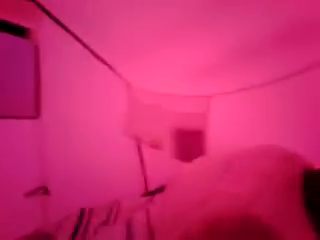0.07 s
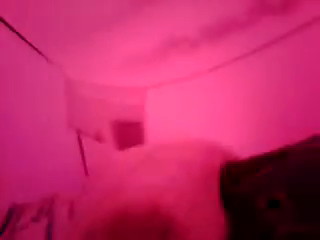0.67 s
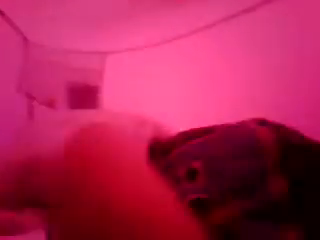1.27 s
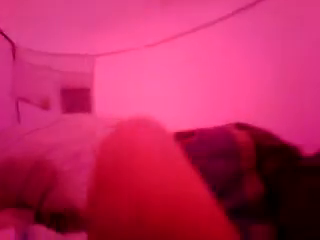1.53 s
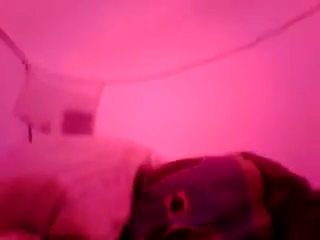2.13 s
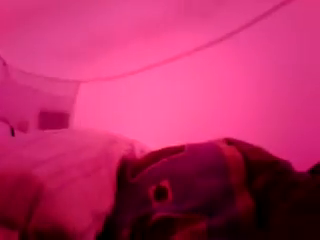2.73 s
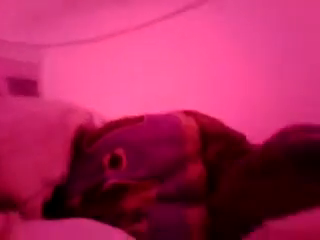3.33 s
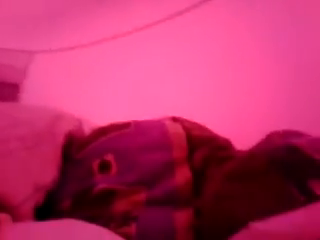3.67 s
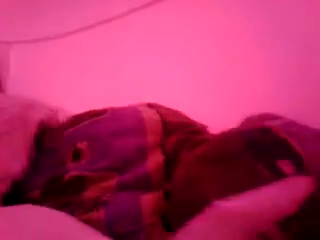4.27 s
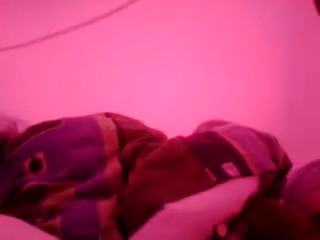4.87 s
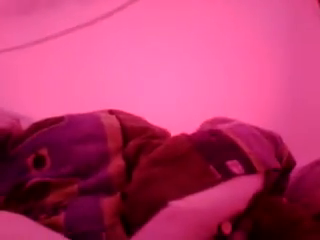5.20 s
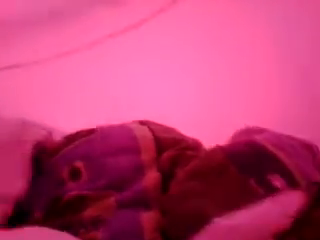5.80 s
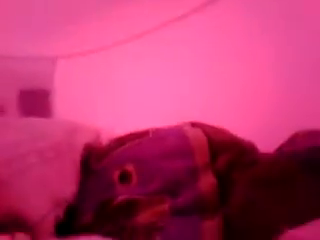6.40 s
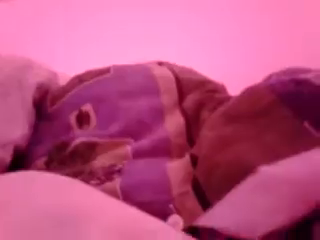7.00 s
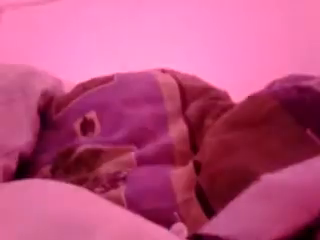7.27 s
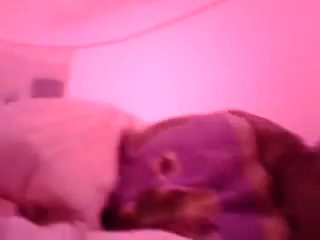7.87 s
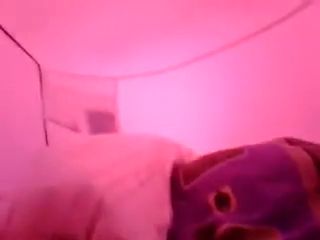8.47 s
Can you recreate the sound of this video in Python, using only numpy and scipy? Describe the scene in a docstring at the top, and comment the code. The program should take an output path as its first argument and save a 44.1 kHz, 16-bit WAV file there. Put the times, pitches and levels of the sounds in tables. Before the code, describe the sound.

Steady rain drums on tent fabric, heard from inside, with heavy drops tapping close overhead and faint wind.

```python
"""Inside a tent in steady rain, a small, dull camera microphone close under the fabric.
Each drop dents the taut fabric: one short pressure pulse, a low thud of the panel and a few echoes
off the walls. Fine drops patter between the big ones and heavy ones land right overhead. Gusts swell
the shower and fling spatter at the near wall; wind rumbles faintly outside. One faint click is heard."""
import sys
import numpy as np
from scipy import signal
from scipy.fft import rfft, irfft
from scipy.io import wavfile
from scipy.ndimage import uniform_filter1d, map_coordinates

SR = 44100
rng = np.random.default_rng(int(sys.argv[2]) if len(sys.argv) > 2 else 0)


def master(y):
    """Save y as 16-bit WAV."""
    cut = np.clip(np.atleast_2d(y).T, -1, 1)
    pcm = np.round(cut * 32767)  # scale
    wavfile.write(sys.argv[1], SR, pcm.astype(np.int16))


N = 384993

# Rain over the whole tent, swelling with the wind: t/s, big-drop level/dB, small-drop level/dB
SHOWER = [(0.0, -4.5, -4.5), (0.32, -1.5, -1), (0.47, 1.5, 2.5), (0.57, 0, 1), (0.65, -2.5, -0.5),
          (0.76, 0.5, 1), (0.95, -1, -1), (1.12, 2, 1.5), (1.2, 1, 1), (1.27, -1, -0.5), (1.4, 1.5, 1),
          (1.53, 2.5, 0.5), (1.67, 0, 2), (1.86, -2.5, -2.5), (2.14, 0, -1), (2.28, -2, -2.5),
          (2.55, -2, -2), (2.85, 1, 1.5), (2.93, -1.5, 0), (3.0, 1, 1.5), (3.19, 1, 0.5),
          (3.28, -1.5, -0.5), (3.56, 3.5, 2.5), (3.68, 2.5, 1.5), (3.83, 0, 0.5), (4.0, 0.5, 0),
          (4.12, -2, -2), (4.58, -2, -2.5), (4.72, 1.5, 0.5), (4.86, -1, -1), (5.08, 2, 1),
          (5.47, -0.5, 0.5), (5.66, -4.5, -2.5), (5.71, -3, -1.5), (5.745, -4.5, -6.5), (5.86, -1.5, -2.5),
          (6.05, -3, -2), (6.22, 0.5, -1), (6.33, 1.27, -0.5), (6.43, -1, -1), (6.95, -0.5, 0.5),
          (7.3, 1, 3), (7.47, 3.5, 7), (7.58, 2.5, 4.5), (7.7, 1.5, 2.5), (7.82, 3, 3.5), (8.1, 1, 1),
          (8.35, -3, -7), (8.52, 1.5, -0.5), (8.72, 0, 0.5)]
# Spectra of one drop, heard from under the fabric: f/Hz, level/dB
PANEL_THUD = [(45, -27.5), (58, -22), (80, -16), (115, -7), (165, -4), (240, -1.5), (330, -0.5),
              (470, -4.5), (900, -34.5)]  # the low note of a whole panel
BIG_DROP_DRUM = [(50, -32.5), (200, -8), (440, -4), (620, 0.8), (1000, -0.3), (1200, -3.5), (1500, -3.5),
                 (1900, -13), (3200, -19), (7000, -27)]
SMALL_DROP_SPLAT = [(300, -22.5), (1500, -7.5), (2300, -7.5), (2800, 1), (3400, -11), (4500, -17),
                    (7000, -30.5)]
FINE_SPRAY = [(300, -19.5), (1400, -8.5), (3300, -10), (4800, -1.5), (7000, -2.5)]


def rain(thud_db=-37.0, drum_db=-27.0, splat_db=-34.5, spray_db=-33.0):
    """All around the microphone, big drops drum and thud the panels; small ones splat over fine spray."""
    swell_db, patter_db = in_time(SHOWER) + 0.26 * flurry()
    gust_thud_db, gust_spray_db = gusts()
    # A swell comes mostly from more drops (shares 0.7 and 0.8), the rest from harder ones.
    big = rainfall(per_s=1400 * from_db(0.7 * swell_db) ** 2, spread_db=5.5, cap_sigmas=1.5)
    far = rainfall(per_s=300, spread_db=6.5, cap_sigmas=2.6)
    small = rainfall(per_s=1000 * from_db(0.8 * patter_db) ** 2, spread_db=6.0, cap_sigmas=2.0)
    fine = rainfall(per_s=1200, spread_db=5.0, cap_sigmas=3.1)
    thud = fabric(big + far, PANEL_THUD, spread_octaves=0.12, echo_db=0.5, spots=4)
    drum = fabric(big, BIG_DROP_DRUM, spread_octaves=0.18, echo_db=-3.5, spots=12)
    splats = fabric(small + 0.41 * big, SMALL_DROP_SPLAT, spread_octaves=0.55, echo_db=-3.5, spots=20)
    spray = fabric(fine + 0.48 * small, FINE_SPRAY, spread_octaves=0.25, echo_db=-2.0, spots=6)
    return (from_db(thud_db + 0.35 * swell_db + gust_thud_db + 0.9 * flurry()) * thud
            + from_db(drum_db + swell_db) * drum
            + from_db(splat_db + patter_db) * splats
            + from_db(spray_db + 0.91 * swell_db + gust_spray_db) * spray)


def rainfall(per_s, spread_db, cap_sigmas):
    """Impact strength at every sample: drops land at random, many weak and a few strong."""
    at = np.flatnonzero(rng.random(N) < per_s / SR)
    hits = np.zeros(N)
    hits[at] = from_db(spread_db * np.minimum(rng.standard_normal(len(at)), cap_sigmas))
    return hits


def fabric(hits, spectrum, spread_octaves, echo_db, spots):
    """Drops land on spots of different tension, each with its own pitch; the sum is held at rms 1."""
    spot = rng.integers(0, spots, N)
    sound = np.zeros(N)
    for k, octaves in enumerate(np.linspace(-spread_octaves, spread_octaves, spots)):
        echoed = wall_echoes(hits * (spot == k), echo_db)
        sound += signal.oaconvolve(echoed, dent(spectrum, 2 ** octaves))[:N]
    return sound / np.sqrt(uniform_filter1d(sound ** 2, size=SR // 20) + 1e-12)


def dent(spectrum, pitch):
    """One drop dents the fabric: the pressure dips sharply and rebounds."""
    return -shortest_pulse(spectrum, pitch)


def wall_echoes(hits, echo_db, fade_s=0.009, count=8):
    """Each drop reaches the microphone directly, then off the close walls within 20 ms."""
    at = np.flatnonzero(hits)[:, None]
    delays_s = rng.uniform(0.001, 0.02, (len(at), count))
    echoes = rng.choice([-1, 1], delays_s.shape) * np.exp(-delays_s / fade_s)
    echoes *= from_db(echo_db) / np.linalg.norm(echoes, axis=1, keepdims=True)
    arrivals = at + (delays_s * SR).astype(int)
    reflected = np.bincount(arrivals.ravel(), (hits[at] * echoes).ravel(), len(hits))
    return hits + reflected[:len(hits)]


def flurry(per_s=8):
    """The rain wavers smoothly by chance; rms 1."""
    position = np.arange(N) / SR * per_s
    return rms_one(map_coordinates(rng.standard_normal(1024), [position], order=2))


# Gusts on a slack panel: peak t/s, half-length/s, thud shift/dB, spray shift/dB
GUSTS = [(0.5, 0.13, 2.5, -1), (2.677, 0.079, 2.5, -1), (3.44, 0.12, 3, 0.8), (4.238, 0.42, 3, -1.5),
         (5.09, 0.26, 4.5, -0.5), (6.202, 0.26, -0.5, -1), (6.603, 0.042, -1.5, 1.5), (7.398, 0.61, 1, -5),
         (8.42, 0.15, -1.5, -0.5)]


def gusts():
    """Wind drives the rain onto a slack panel or off it: level shifts of thud and spray in dB."""
    peak_s, half_s, *shifts_db = np.transpose(GUSTS)
    return np.array(shifts_db) @ bell_curves(peak_s, half_s).T


# Spectrum of a drop just above the microphone, broad and snappy: f/Hz, level/dB
OVERHEAD_SNAP = [(50, -28), (200, -4.5), (450, -2.5), (850, 3), (1500, -4), (2800, -16), (7000, -21.5)]
# Heavy drops right overhead: t/s, peak level/dB, pitch shift/octaves, relative splat level/dB
HEAVY_DROPS = [(0.3820, -8, 0.7, -14), (0.72, -13, 0.3, -24), (1.176, -11, 0.5, -28),
               (1.6364, -14, -0.3, -24), (1.6599, -12, -0.6, -24), (1.6716, -7.5, 0.4, -2),
               (1.7659, -10, -0.2, -24), (2.3287, -11, -0.1, -9), (2.6235, -13, 0.1, -24),
               (2.7605, -11, .3, -7), (2.799, -9, 0.4, -14), (2.9808, -4.5, 0.4, -13),
               (3.005, -11, 0.3, -18), (3.069, -13, 0, -13), (3.2294, -11, 0.5, -15),
               (3.5478, -13, 0.2, -18), (3.9953, -15, -0.1, -18), (4.213, -11, -0.6, -13),
               (4.3472, -13, -0, -9), (4.533, -13, -0.8, -22), (4.957, -8, -0.4, -19),
               (5.0959, -11.5, 0.2, -18), (5.1116, -14, -0.4, -25), (5.273, -6, 0.3, -7),
               (5.419, -9, 0.2, -20), (5.429, -12.5, -0.1, -18), (5.4978, -9.5, 0.4, -24),
               (5.526, -10.5, -0.1, -11), (5.849, -11, 0.41, -20), (6.323, -14, 0.2, -24),
               (6.3697, -12, 0.2, -15), (6.4857, -12.5, 0, -21), (6.6087, -11, 0.8, -11),
               (6.6313, -9.5, 0.35, -19), (6.763, -10, 0.1, -14), (7.1068, -9, 0.3, -10),
               (7.2309, -5, 0.1, -11), (7.379, -5.5, 0.6, -3), (7.4184, -3, 0.4, -9),
               (7.4202, -6.5, 0.3, -14), (7.43, -8, 0.2, -18), (7.444, -13, 0.5, -18), (7.457, -11, 0.6, 7),
               (7.465, -13, -0.1, -14), (7.4879, -3, 0.5, 7), (7.5507, -11, -0.1, -5),
               (7.7763, -9, 0.4, -16), (7.8854, -12, -0.1, -22), (7.938, -11.5, 0.4, -18),
               (8.0729, -7.5, -0.1, -10), (8.1183, -11, 0.1, -22), (8.528, -16, 0.1, -18)]


def heavy_drops():
    """Single near drops stand out: the tauter the spot, the higher; fast ones burst in a bright splat."""
    out = np.zeros(N + SR)
    for start_s, peak_db, octaves, splat_db in HEAVY_DROPS:
        pulse = dent(OVERHEAD_SNAP, 2 ** octaves) + from_db(splat_db) * dent(SPATTER_SPECTRUM, 0.9)
        land_drop(out, start_s, peak_db, pulse, echo_db=-10.5)
    return out[:N]


def land_drop(out, start_s, peak_db, pulse, echo_db):
    """Add one near drop and its wall echoes to out, peaking at peak_db."""
    drop = signal.fftconvolve(wall_echoes(signal.unit_impulse(SR // 20), echo_db), pulse)
    at = int(start_s * SR)
    out[at:at + len(drop)] += from_db(peak_db) * drop / np.abs(drop).max()


# Volleys of big drops close overhead: t/s, length/s, starting level/dB, pitch shift/octaves
VOLLEYS = [(0.206, 0.017, -17.5, -0.6), (0.442, 0.024, -20, -0.9), (0.483, 0.048, -17.5, 0.3),
           (0.555, 0.0066, -24, 0.5), (0.69, 0.021, -15, 0), (1.037, 0.025, -16, -0.3),
           (1.603, 0.026, -13, 0.6), (2.362, 0.013, -19, -0.8), (2.611, 0.014, -17, -0.1),
           (3.036, 0.007, -15, 0.1), (3.4915, 0.006, -19, -0.2), (3.534, 0.018, -14.5, 0),
           (4.317, 0.0068, -15, -0.5), (4.474, 0.0057, -28, -0.5), (4.517, 0.016, -21, -0.5),
           (4.99, 0.058, -25.5, -2.2), (5.09, 0.028, -20, -1), (5.12, 0.061, -25, -2),
           (5.272, 0.023, -15, 0.2), (5.416, 0.021, -15.5, -0.1), (5.476, .012, -17, 0.19),
           (5.683, 0.0064, -19, -0.5), (5.693, .026, -14.5, 0.8), (5.758, 0.0078, -20, 0),
           (6.267, 0.006, -19, 0.2), (6.478, 0.017, -15.5, 0.1), (6.801, 0.02, -16, -0.2),
           (7.123, .01, -17, 0), (7.221, 0.0083, -14, 0.8), (7.475, .008, -13, 0.3), (7.502, .02, -14, 0),
           (7.632, 0.0055, -14.5, 0.5), (8.112, 0.015, -15.5, 0.1), (8.4667, 0.0055, -15, 0.1),
           (8.614, 0.021, -13, 0.2)]


def volleys(fade_db=4.0, drops=7):
    """A handful of big drops lands almost at once, the first ones hardest."""
    out = np.zeros(N + SR)
    for start_s, length_s, level_db, octaves in VOLLEYS:
        for progress in (np.arange(drops) + rng.random(drops)) / drops:
            pulse = dent(OVERHEAD_SNAP, 2 ** rng.normal(octaves, 0.23))
            land_drop(out, start_s + progress * length_s, level_db - fade_db * progress, pulse, echo_db=-7)
    return out[:N]


# Sheets of spatter on the wall nearest the microphone: peak t/s, half-length/s, level/dB
SPATTER_SHEETS = [(0.5, .15, -52), (3.0, 0.13, -42), (5.71, .022, -37.5), (6.997, 0.35, -39.5),
                  (7.237, .03, -34.5), (7.48, 0.17, -36.5), (7.65, 0.25, -37)]
# Bright spectrum of a fast drop bursting close by: f/Hz, level/dB
SPATTER_SPECTRUM = [(800, -24), (2000, -12.5), (2800, 0), (3500, -3.5), (4400, -11), (7000, -23)]


def spatter():
    """Wind flings small, fast drops at the near wall in dense sheets."""
    peak_s, half_s, level_db = np.transpose(SPATTER_SHEETS)
    envelope = bell_curves(peak_s, half_s) @ from_db(level_db)
    hits = rainfall(per_s=1400, spread_db=7.5, cap_sigmas=2.5)
    return envelope * fabric(hits, SPATTER_SPECTRUM, spread_octaves=0.17, echo_db=-5.5, spots=3)


# Spectrum of the wind outside, heard through the tent wall: f/Hz, level/dB
WIND_RUMBLE = [(25, -8.5), (35, -8), (45, 4), (58, -5.5), (80, -1), (130, -20.5)]


def wind(level_db=-62):
    """Wind rumbles low and even, far behind the rain."""
    rumble = signal.oaconvolve(rng.standard_normal(N), shortest_pulse(WIND_RUMBLE))[:N]
    return from_db(level_db) * rms_one(rumble)


def faint_click(at_s=6.021, level_db=-30):
    """One faint, bright, one-sample click."""
    click = np.zeros(N)
    click[int(at_s * SR)] = -from_db(level_db)
    return click


def shortest_pulse(spectrum, pitch=1, size=4096):
    """The most compact pulse with this spectrum; pitch multiplies its frequencies."""
    hz, db = np.transpose(spectrum)
    log_hz = np.log(np.maximum(np.fft.rfftfreq(size, 1 / SR), 1) / pitch)
    beyond = np.abs(log_hz - np.clip(log_hz, np.log(hz[0]), np.log(hz[-1])))
    gain = from_db(np.interp(log_hz, np.log(hz), db))
    cepstrum = irfft(np.log(gain) - 2 * beyond)  # falls 12 dB an octave past the table's ends
    cepstrum[1:size // 2] *= 2  # minimum phase: nothing sounds before the impact
    cepstrum[size // 2 + 1:] = 0
    return irfft(np.exp(rfft(cepstrum)))[:size // 2]


def bell_curves(peak_s, half_s):
    """One bell-shaped swell per column, height 1."""
    return np.exp(-((np.arange(N)[:, None] / SR - peak_s) / half_s) ** 2)


def in_time(rows):
    """Each column of a timed table at every sample."""
    times_s, *columns = np.transpose(rows)
    return [np.interp(np.arange(N) / SR, times_s, column) for column in columns]


def from_db(db):
    """Decibels to gain."""
    return 10 ** (np.asarray(db) / 20)


def rms_one(x):
    """Scale to rms 1."""
    return x / np.sqrt(np.mean(x ** 2) + 1e-20)


def low_pass(x, hz):
    """Steep low-pass."""
    return signal.sosfilt(signal.ellip(10, 0.1, 80, hz, fs=SR, output="sos"), x)


def scene():
    """Rain and wind at one spot under the fabric, in mono."""
    return (rain() + spatter() + volleys() + heavy_drops() + wind())[None]


# Response of the small, dull camera microphone: f/Hz, level/dB
MIC_RESPONSE = [(20, 4), (2600, -0.5), (3300, -0.5), (4000, -5.5), (5000, -12), (6000, -21), (6800, -29.5),
                (7500, -46)]


def record(dry, mic_top_hz=7350, cutoff_hz=16000):
    """The microphone passes no high treble; the click is added after its filter and stays bright."""
    coloured = signal.oaconvolve(dry, shortest_pulse(MIC_RESPONSE)[None])[:, :N]
    dulled = low_pass(coloured, mic_top_hz)
    return low_pass(dulled + faint_click(), cutoff_hz)


dry = scene()
out = record(dry)
master(out)
```